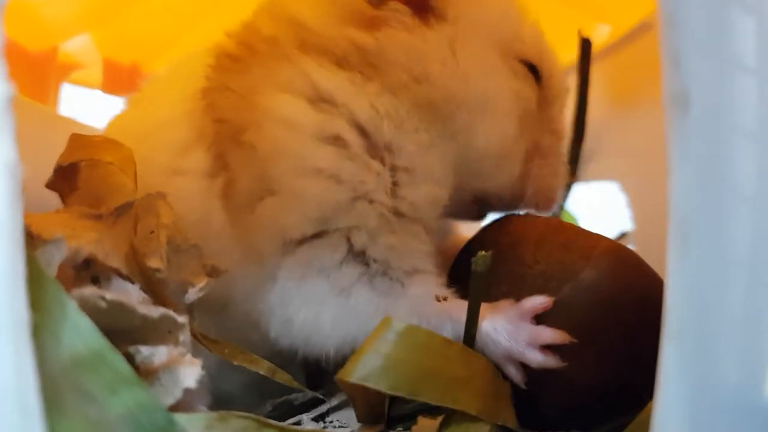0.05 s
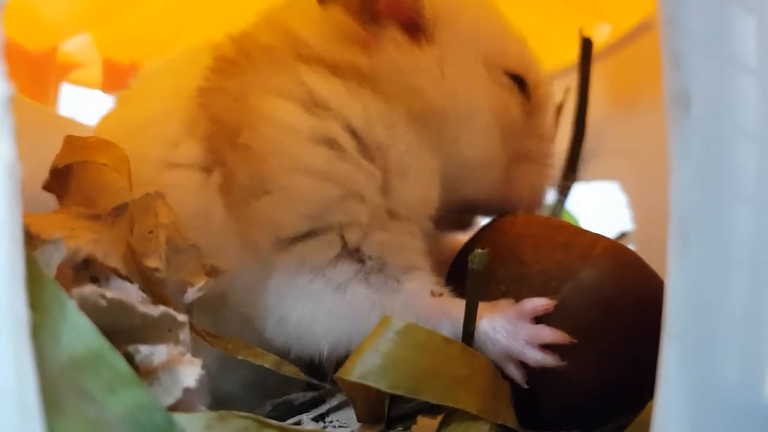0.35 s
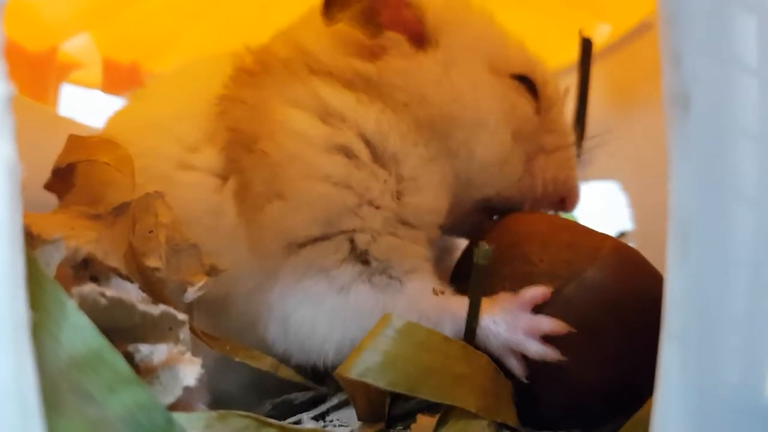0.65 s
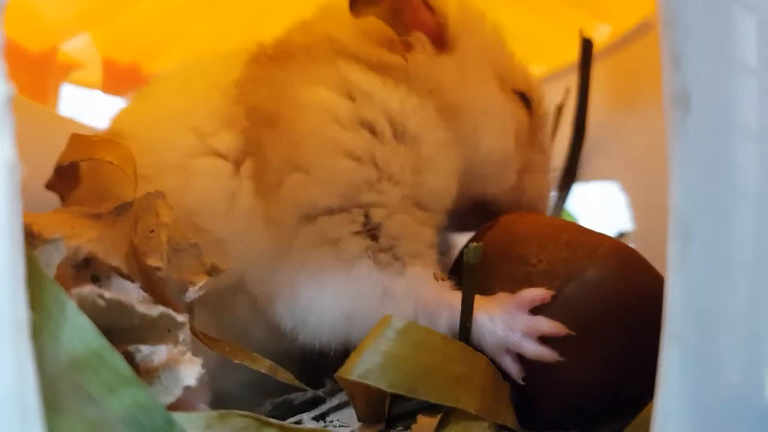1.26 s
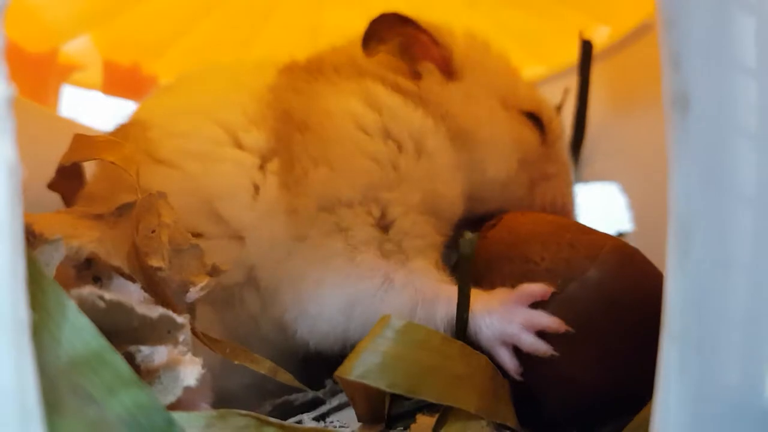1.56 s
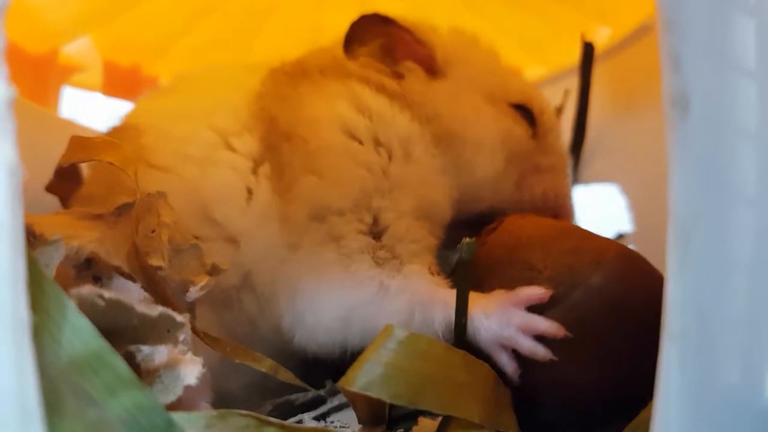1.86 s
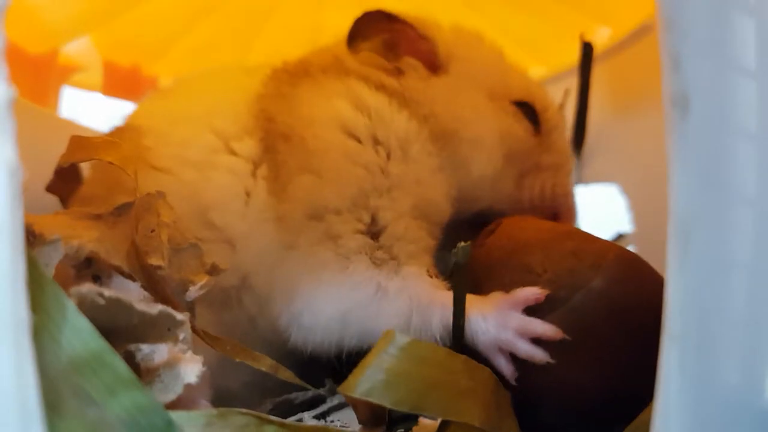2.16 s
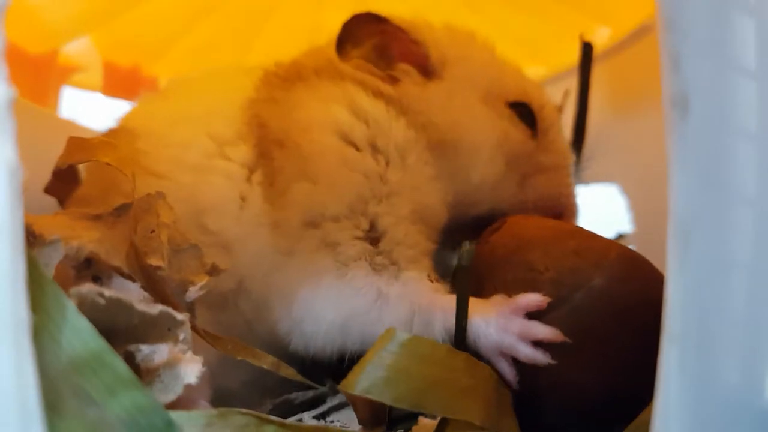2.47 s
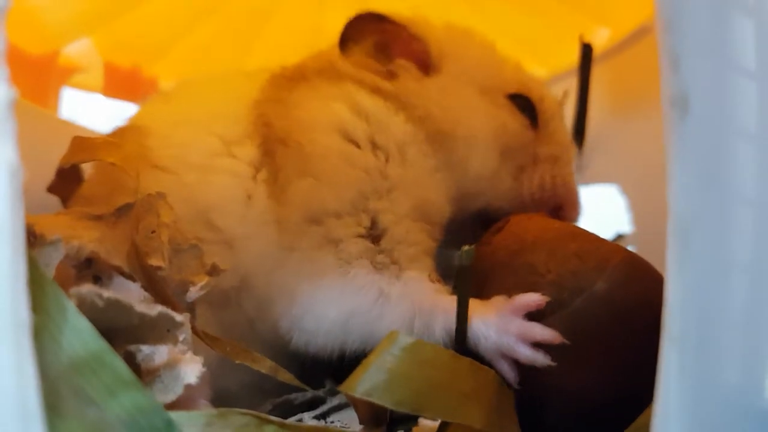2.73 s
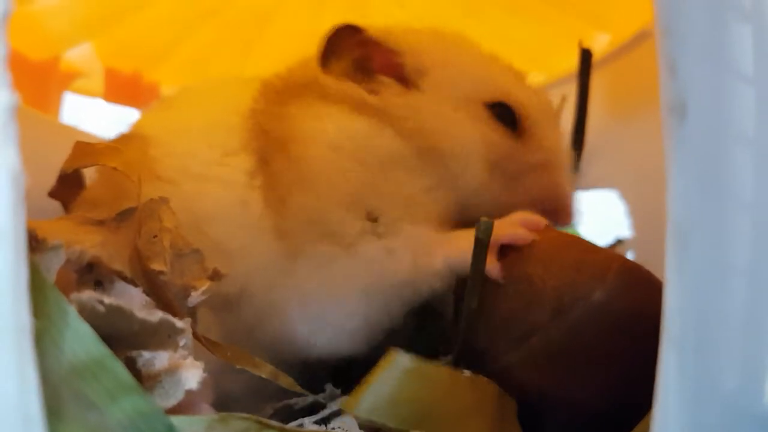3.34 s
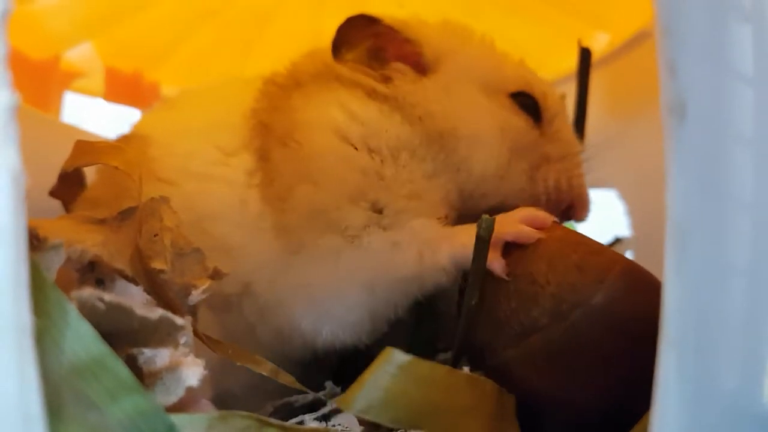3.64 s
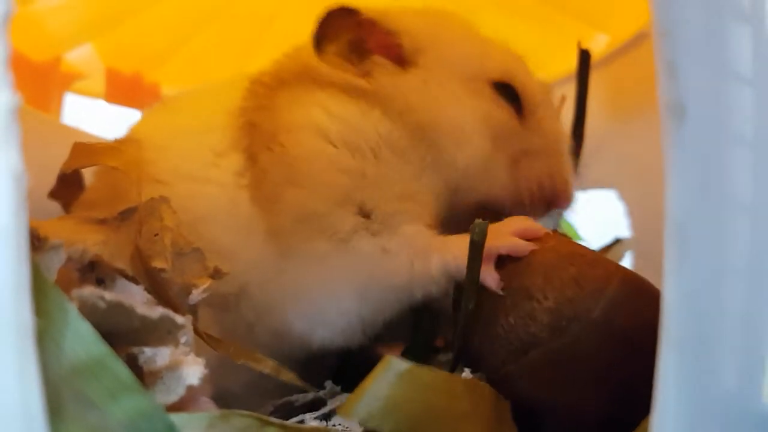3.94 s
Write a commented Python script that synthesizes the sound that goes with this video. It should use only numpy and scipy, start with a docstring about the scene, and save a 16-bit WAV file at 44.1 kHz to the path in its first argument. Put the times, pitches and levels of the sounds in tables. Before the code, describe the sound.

A hamster gnaws a chestnut, its teeth tapping and scraping irregularly, with sharp cracks whenever the shell gives. Dry bedding crackles faintly in its small shelter. The sound is close and slightly right, over low room rumble and hiss.

```python
"""A hamster gnaws a chestnut in its small shelter, close by and a little to the right.
Each contact of the teeth is an impulse that excites the resonances of nut, shell and floor:
taps knock and scrape, fibres tick, the shell cracks now and then, and stick-slip friction creaks.
Dry bedding crackles under the paws and brushes against the fur, over the rumble and hiss of the room."""
import sys
import numpy as np
from scipy import signal
from scipy.fft import rfft, irfft, next_fast_len
from scipy.io import wavfile

SR = 44100
rng = np.random.default_rng(int(sys.argv[2]) if len(sys.argv) > 2 else 0)


def waveform_to_disk(signal):
    """Save audio, clipped to [-1, 1], as 16-bit WAV at the path in sys.argv[1]."""
    frames = np.transpose(np.atleast_2d(signal))
    scaled = np.clip(frames, -1, 1) * 32767
    samples = np.round(scaled).astype(np.int16)
    wavfile.write(sys.argv[1], SR, samples)


N = 176400

# Levels in the tables are relative; each source adds its own gain.
# swell of the room's rumble: time_s, level_db
RUMBLE_LEVEL = [(0, -52), (.3, -54.5), (.68, -54.5), (.78, -48.5), (1.2, -49), (1.45, -53.5), (1.9, -55.5),
                (2.15, -51.5), (2.4, -58), (2.52, -51.5), (2.8, -54), (3.35, -55), (3.6, -54), (4, -53)]
# spectra of the room's noise: frequency_hz, level_db
RUMBLE_SPECTRUM = [(15, -35.5), (28, -6), (38, -12), (55, -15.5), (85, -1.5), (108, -2), (135, -8),
                   (200, -17.5), (300, -25.5), (600, -44), (1500, -113)]
HISS_SPECTRUM = [(30, 1.5), (150, 13.5), (300, 6.5), (470, -10.5), (570, 5.5), (680, -2.5), (900, -1.5),
                 (1300, -3.5), (2000, -5.5), (3000, -12), (4500, -20.5), (6500, -22), (9500, -26),
                 (12000, -22), (15000, -19.5), (15800, -15.5), (16300, -62)]
# likeness of that noise at left and right: frequency_hz, coherence
ROOM_COHERENCE = [(60, 0.87), (130, 0.77), (290, 0.2), (640, 0.74), (1400, -0.22), (3100, -.08),
                  (7000, -0.11)]
# strength of the bedding's crackle: time_s, level_db
BEDDING_LEVEL = [(0, -58.5), (.4, -100), (.5, -65), (.7, -64), (.9, -61), (1.05, -60.5), (1.13, -58.5),
                 (1.3, -78), (1.7, -63), (2.1, -62.5), (2.35, -70), (2.55, -59), (2.95, -67), (3.2, -67),
                 (3.45, -59), (3.65, -66.5), (3.9, -68), (4, -53.5)]
# spectra of crackling and brushed bedding: frequency_hz, level_db
BEDDING_SPECTRUM = [(150, -31), (400, 20), (700, 16.5), (1100, 5.5), (2300, -17.5), (3300, -17.5),
                    (4500, -8.5), (6300, -24.5), (8200, -17), (10000, -8.5), (14000, -18)]
BRUSH_SPECTRUM = [(300, -5), (600, -0.5), (1200, -8), (2400, -6.5), (3200, -20.5), (4500, -30.5),
                  (8000, -31), (15000, -37)]
# teeth tapping the nut: start_s, knock_db, scrape_db
TOOTH_TAPS = [(0.368, -47.5, -66), (0.499, -43.5, -52.5), (0.518, -45, -58.5), (0.551, -45, -75),
              (0.66, -43.5, -56.5), (0.705, -47.5, -73), (0.757, -44, -77), (0.857, -39.5, -78),
              (0.888, -42.5, -55), (0.909, -35.5, -61), (0.939, -44.5, -57), (1.059, -43.5, -56),
              (1.095, -40, -68), (1.139, -43.5, -51.5), (1.153, -47, -76), (1.242, -46.5, -56),
              (1.465, -46, -62), (1.529, -45, -58), (1.546, -45.5, -54), (1.668, -48, -57),
              (1.709, -47, -68), (1.726, -42, -55.5), (1.802, -41, -63), (1.898, -44.5, -51.5),
              (1.971, -44, -76), (1.991, -44, -56), (2.047, -44, -55), (2.161, -47, -79),
              (2.215, -48.5, -62), (2.235, -44, -54), (2.453, -41.5, -56.5), (2.526, -41, -52.5),
              (2.553, -69, -71), (2.596, -41, -70), (2.627, -41, -51.5), (2.729, -47.5, -77),
              (2.784, -45, -57), (2.813, -42.5, -71), (2.844, -42.5, -54), (2.917, -36.5, -59),
              (2.954, -36.5, -50), (3.027, -45.5, -70), (3.112, -45.5, -56.5), (3.194, -42.5, -58),
              (3.207, -48, -57.5), (3.353, -45.5, -59), (3.371, -48, -61), (3.462, -33, -55.5),
              (3.494, -38.5, -55), (3.501, -41.5, -51.5), (3.572, -41.5, -64), (3.68, -48, -86),
              (3.745, -40, -51), (3.818, -39.5, -74), (3.988, -40.5, -50)]
# dry fibres parting: start_s, level_db
FIBRE_TICKS = [(0.4718, -59), (0.6135, -54.5), (1.1258, -53.5), (1.87, -65), (2.834, -58), (3.0136, -56.5),
               (3.0787, -55.5), (3.255, -56.5), (3.3273, -58), (3.524, -60), (3.5476, -53.5), (3.7154, -58),
               (3.9454, -51)]
# shell cracks, close rows being stages of one bite: start_s, knock_db, snap_db, splinter_db
SHELL_CRACKS = [(0.7763, -40, -46, -49.5), (0.782, -45, -44.5, -55), (0.8099, -28.5, -38.5, -44),
                (0.9759, -46, -39.5, -43.5), (0.997, -30.5, -34.5, -38), (1.0048, -36.5, -56, -51),
                (1.0078, -39.5, -43.5, -43.5), (1.5993, -35, -26, -27.5), (1.6034, -32.5, -46, -53),
                (1.7713, -44, -46.5, -60), (1.7774, -29, -31, -33.5), (1.7836, -37, -44.5, -49),
                (1.95, -31.5, -40, -44), (1.954, -35, -36.5, -51), (1.9578, -39, -41.5, -60),
                (2.0816, -46, -46, -59), (2.0871, -42, -52, -63), (2.0887, -41, -42.5, -46.5),
                (2.1022, -42, -47.5, -65), (2.1092, -35, -44.5, -52), (2.4906, -41, -48, -47.5),
                (2.4966, -43, -42.5, -52), (2.5019, -39, -42.5, -51), (2.6502, -48, -45.5, -53),
                (2.6537, -54, -51, -56), (2.6788, -34, -44, -46), (2.6801, -47, -40, -39.5),
                (2.6885, -59, -50.5, -55), (3.403, -40, -45, -58), (3.8527, -49, -50.5, -57),
                (3.861, -47, -48, -50), (3.8739, -29.5, -36.5, -26), (3.937, -34.5, -41, -48.5)]
# fur brushing the bedding: centre_s, half_width_s, level_db
FUR_BRUSHES = [(1.16, 0.091, -60.5), (3.178, 0.061, -58)]
# teeth sticking and slipping: start_s, length_s, pitch_hz, level_db
TOOTH_CREAKS = [(2.096, 0.025, 694, -41.5), (2.651, 0.0098, 563, -35.5), (3.957, 0.024, 343, -45)]
# responses of the nut, struck softly and hard, and of the floor: frequency_hz, gain_db
SOFT_KNOCK_RESPONSE = [(120, -21), (260, -9), (400, 2.5), (480, -3.5), (570, 3), (740, 1), (880, -22),
                       (1250, -9), (1800, -36.5), (4000, -74.5)]
HARD_KNOCK_RESPONSE = [(150, -23.5), (270, -22), (350, -2), (440, -12.5), (560, 3), (660, 0.5), (760, 3),
                       (900, -5.5), (1100, -12), (1500, -20.5), (2200, -61.5), (4000, -70.5)]
FLOOR_RESPONSE = [(30, -19), (70, -16.5), (110, 3.5), (140, -5.5), (180, 3), (250, -8.5), (500, -31),
                  (1500, -82)]
# responses of the shell, scraped and snapped, and of its splinters: frequency_hz, gain_db
SCRAPE_RESPONSE = [(600, -20), (1100, -6), (1500, -6), (1900, -1), (2400, 0), (2800, -7), (3400, -8),
                   (4400, -11), (6200, -20), (8200, -15), (10000, -21), (13000, -17), (16000, -18)]
SNAP_RESPONSE = [(500, -30), (1100, -10), (1500, -8), (1950, -1), (2400, 1), (3000, -5), (3370, -1),
                 (3800, -4), (4400, 1), (4850, -4), (5200, -1), (5900, -18), (7000, -20), (10000, -32),
                 (16000, -45)]
SPLINTER_RESPONSE = [(2000, -33), (4500, -31), (6000, -12), (7200, -8.5), (7950, -2.5), (8600, -2),
                     (9400, -12), (10400, -1), (11200, -7), (12150, -6.5), (12900, -7.5), (13500, -14),
                     (14200, 1), (16000, -17.5)]
# acoustic shadow at the farther, left microphone: frequency_hz, gain_db
LEFT_SHADOW = [(100, -.5), (220, -1), (400, -4), (700, -7.5), (1300, -6.5), (2400, -3.5), (4400, -7),
               (8000, -6), (15000, -7)]
# delay of the path round the nut to that microphone: frequency_hz, delay_ms
LEFT_DELAY = [(700, .25), (1400, .22), (2000, .17), (2450, .25), (2850, .27), (3800, .26), (5400, .21),
              (8000, .25), (13000, .23)]

RING_TIME_S = np.arange(4096) / SR  # time axis of one short sound
SNAP_DECAY_S, SPLINTER_DECAY_S, SCRAPE_DECAY_S = 0.0018, 0.0016, 0.0022  # of the fracture bursts


def amp(db):
    """Decibels to amplitude ratio."""
    return 10 ** (np.asarray(db) / 20)


def unit(x):
    """Normalisation to rms 1."""
    return x / np.sqrt(np.mean(x ** 2) + 1e-20)


def unit_burst(x, span_s):
    """Normalisation to the energy of a signal of rms 1 lasting span_s."""
    return x / np.sqrt(np.sum(x ** 2) / (span_s * SR) + 1e-20)


def along(points, hz):
    """Interpolation on a logarithmic frequency axis."""
    point_hz, values = np.transpose(points)
    return np.interp(np.log(hz + 1), np.log(point_hz + 1), values)


def curve(points):
    """Linear interpolation in time, one value per sample."""
    return np.interp(np.arange(N) / SR, *np.transpose(points))


def filtered(x, response):
    """Linear filtering: the spectrum is multiplied by a frequency response."""
    size = next_fast_len(N + SR // 2)
    return irfft(rfft(x, size) * response(np.fft.rfftfreq(size, 1 / SR)), size)[..., :N]


def ring(response, tilt_db_per_octave=0):
    """Minimum-phase impulse response: the free vibration of a body struck once."""
    size = len(RING_TIME_S)
    hz = np.fft.rfftfreq(size, 1 / SR)
    gain_db = along(response, hz) + tilt_db_per_octave * np.log2(1 + hz / response[0][0])
    cepstrum = irfft(np.log(amp(gain_db)))
    cepstrum[1:size // 2] *= 2  # folding onto positive time makes the ring causal
    cepstrum[size // 2 + 1:] = 0
    return irfft(np.exp(rfft(cepstrum)))


def echoes(x, t60_s):
    """Diffuse reflections decay exponentially and differ at each microphone."""
    tail = rng.standard_normal((2, len(RING_TIME_S))) * amp(-60 * RING_TIME_S / t60_s)
    tail *= RING_TIME_S > .0005  # travel time of the first reflection
    tail /= np.linalg.norm(tail, axis=1, keepdims=True)
    return signal.fftconvolve(x[None], tail, axes=1)[:, :len(x)]


def sheltered(x):
    """Direct sound adds to the reverberation of the close walls and of the room."""
    return x + amp(-11) * echoes(x, t60_s=.017) + amp(-28) * echoes(x, t60_s=.15)


def add(track, start_s, sound):
    """Superposition: a sound and its reflections join the stereo track."""
    start = max(round(start_s * SR), 0)
    track[:, start:start + len(sound)] += sheltered(sound)[:, :max(N - start, 0)]


def room_noise(spectrum):
    """Partly coherent noise: the balance of mid and side sets how alike the channels are."""
    def mid_side_gains(hz):
        angle = np.arccos(np.clip(along(ROOM_COHERENCE, hz), -1, 1)) / 2
        return amp(along(spectrum, hz)) * [np.cos(angle), np.sin(angle)]
    mid, side = filtered(rng.standard_normal((2, N)), mid_side_gains)
    return unit(np.array([mid + side, mid - side]))


def bedding(grains_per_s=260, spread_db=1.5, decay_s=0.00073):
    """Shot noise: dry leaves and crumbs emit tiny bursts at random instants."""
    sizes = amp(spread_db * np.minimum(rng.exponential(size=N), 4))
    onsets = rng.random(N) < grains_per_s / SR
    envelope = signal.fftconvolve(sizes * onsets, np.exp(-RING_TIME_S / decay_s))[:N]
    grains = envelope * rng.standard_normal(N)
    crackle = filtered(grains, lambda hz: amp(along(BEDDING_SPECTRUM, hz)))
    return amp(curve(BEDDING_LEVEL)) * unit(crackle)


def knock(response, thud_db):
    """Mechanical coupling: the struck nut rings and drives the floor beneath it."""
    nut = unit_burst(ring(response), span_s=0.0028)
    floor = unit_burst(ring(FLOOR_RESPONSE), span_s=0.0052)
    return nut + amp(thud_db) * floor


def fracture(response, decay_s, tilt_db_per_octave=0):
    """Stress release: one break and a dying burst of smaller ones excite the shell."""
    force = 0.15 * rng.laplace(size=len(RING_TIME_S)) * np.exp(-RING_TIME_S / decay_s)
    force[0] = 1  # the first break
    vibration = signal.fftconvolve(force, ring(response, tilt_db_per_octave))[:len(force)]
    return unit_burst(vibration, span_s=0.0021)


def taps():
    """Impact and friction: the teeth catch and slip, giving a dull knock and a small scrape."""
    out = np.zeros((2, N))
    nut = knock(SOFT_KNOCK_RESPONSE, thud_db=-3.5)
    for start_s, knock_db, scrape_db in TOOTH_TAPS:
        scrape = amp(scrape_db + 0.5) * fracture(SCRAPE_RESPONSE, SCRAPE_DECAY_S)
        add(out, start_s, amp(knock_db - 3) * nut + scrape)
    return out


def ticks():
    """Small-scale fracture: fine fibres of the shell part without moving the nut."""
    out = np.zeros((2, N))
    for start_s, level_db in FIBRE_TICKS:
        fibre = fracture(SPLINTER_RESPONSE, SCRAPE_DECAY_S)
        shell = amp(-1.5) * fracture(SNAP_RESPONSE, SCRAPE_DECAY_S)
        add(out, start_s, amp(level_db - 6) * (fibre + shell))
    return out


def cracks():
    """Brittle fracture: the shell gives way with a knock, a snap and a spray of splinters."""
    out = np.zeros((2, N))
    nut = knock(HARD_KNOCK_RESPONSE, thud_db=-14)
    for start_s, knock_db, snap_db, splinter_db in SHELL_CRACKS:
        tilt_db_per_octave = 0.52 * (snap_db + 17.5)  # weaker snaps are duller
        snap = amp(snap_db) * fracture(SNAP_RESPONSE, SNAP_DECAY_S, tilt_db_per_octave)
        splinters = amp(splinter_db - 7.5) * fracture(SPLINTER_RESPONSE, SPLINTER_DECAY_S)
        add(out, start_s, amp(knock_db - 0.5) * nut + snap + splinters)
    return out


def brushes():
    """Sliding friction: fur on the leaves makes noise in soft Gaussian swells."""
    time_s = np.arange(N) / SR
    envelope = sum(amp(level_db) * np.exp(-((time_s - centre_s) / half_width_s) ** 2 / 2)
                   for centre_s, half_width_s, level_db in FUR_BRUSHES)
    friction = filtered(rng.standard_normal(N), lambda hz: amp(along(BRUSH_SPECTRUM, hz)))
    return envelope * unit(friction)


def creaks():
    """Stick-slip oscillation: for a few cycles a tooth grips and releases periodically."""
    out = np.zeros((2, N))
    for start_s, length_s, pitch_hz, level_db in TOOTH_CREAKS:
        envelope = amp(level_db) * np.sin(np.pi * np.minimum(RING_TIME_S / length_s, 1))
        add(out, start_s, envelope * np.sin(2 * np.pi * pitch_hz * RING_TIME_S))
    return out


def left_path(hz):
    """Diffraction round the nut weakens and delays each frequency differently."""
    delay_s = along(LEFT_DELAY, hz) / 1000
    return amp(along(LEFT_SHADOW, hz)) * np.exp(-2j * np.pi * hz * delay_s)


def scene():
    """The sources superpose; the hamster's sounds reach the right side first and louder."""
    left, right = cracks() + taps() + ticks() + creaks() + sheltered(bedding() + brushes())
    rumble = amp(curve(RUMBLE_LEVEL) - 1) * room_noise(RUMBLE_SPECTRUM)
    hiss = amp(-58.5) * room_noise(HISS_SPECTRUM)
    return np.array([filtered(left, left_path), right]) + rumble + hiss


def record(dry):
    """Band limiting: a steep low-pass filter removes the highest treble."""
    cutoff_hz = 16400
    return filtered(dry, lambda hz: 1 / (1 + (hz / cutoff_hz) ** 120))


dry = scene()
out = record(dry)
waveform_to_disk(out)
```